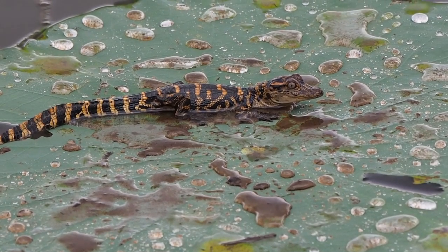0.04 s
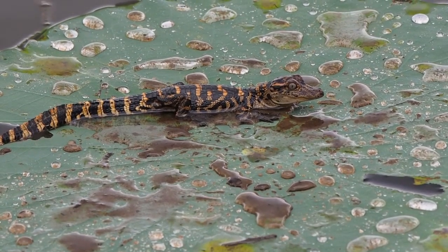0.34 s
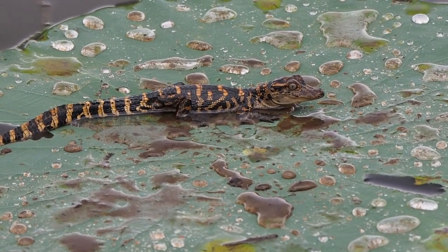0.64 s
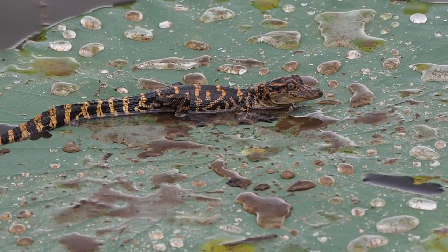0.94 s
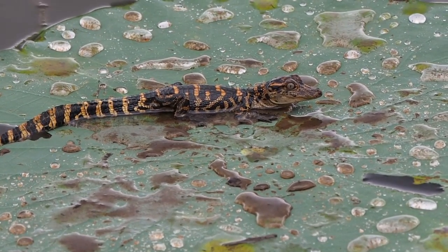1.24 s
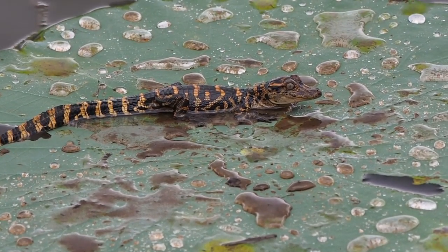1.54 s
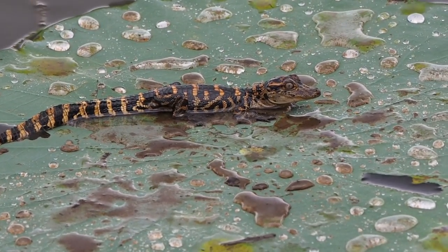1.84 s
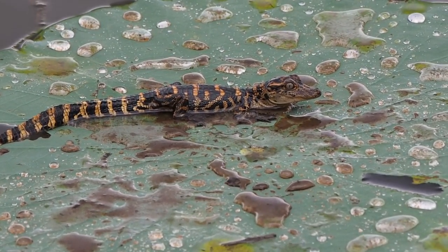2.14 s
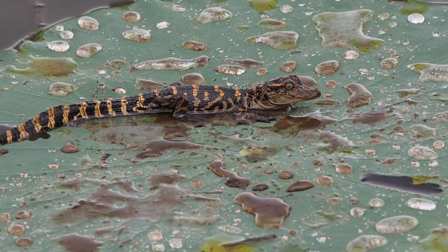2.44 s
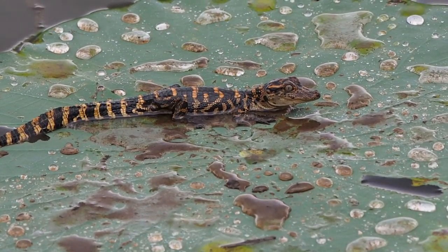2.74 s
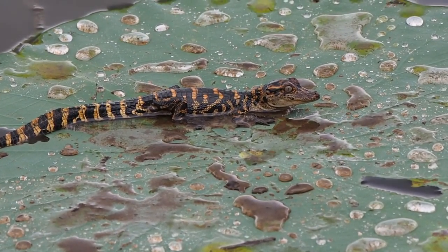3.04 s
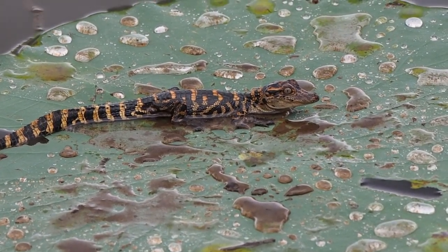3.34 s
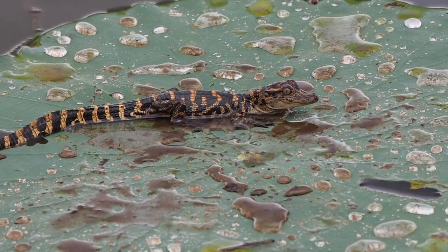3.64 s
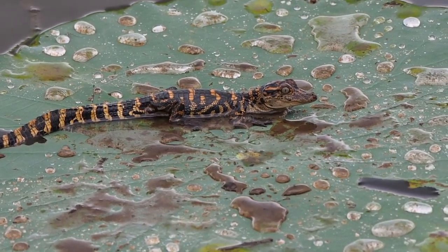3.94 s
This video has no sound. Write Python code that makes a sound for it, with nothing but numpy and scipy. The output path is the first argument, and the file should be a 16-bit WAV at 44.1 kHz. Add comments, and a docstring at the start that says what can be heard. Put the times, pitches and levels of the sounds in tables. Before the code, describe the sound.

A soft, steady breeze hisses through far plants while distant engines hum and leaves faintly tick.

```python
"""A quiet, breezy spot beside open water.
Wind and far traffic make a low rumble, under an even wash of wind in distant plants.
Far motors drone in the rumble, and two of them swell past the middle.
Close by, leaves brush together in short rustles and give tiny wet ticks and a fine crackle.
A thin sizzle, perhaps far insects, sits high above it all."""
import sys
import numpy as np
from scipy import signal
from scipy.fft import rfft, irfft
from scipy.io import wavfile

SR = 44100
rng = np.random.default_rng(int(sys.argv[2]) if len(sys.argv) > 2 else 0)


def to_wav(s):
    """Save 16-bit WAV."""
    ch = np.atleast_2d(s).T  # columns
    pcm = np.round(np.clip(ch, -1, 1) * 32767)  # PCM
    wavfile.write(sys.argv[1], SR, pcm.astype(np.int16))


N = 176400  # 4 seconds

# Colour (how strong each pitch is) of the rumble: pitch_hz, relative_db
RUMBLE_COLOUR = [(20, -16), (35, -30), (52, -9.5), (76, -4), (92, -5), (120, -3.5), (150, -3.5), (172, -1),
                 (194, -4.5), (222, -1.5), (245, -3.5), (272, -7), (380, -7), (500, -12), (900, -36),
                 (2000, -51)]
# The rumble swells with the motors: time_s, change_db
RUMBLE_RISE = [(0, -1), (1.1, -0.5), (1.7, 0), (2.7, 0), (3.3, -1), (4, -1.5)]
# Colour of the wind in far plants: pitch_hz, relative_db
WASH_COLOUR = [(250, -19.5), (520, -11), (630, 0), (730, -2.5), (820, -1.5), (920, -0.3), (1030, 1),
               (1150, -6.5), (1310, -8.5), (1470, -5.5), (2250, -7.5), (3050, -12), (3750, -13),
               (4600, -18), (5300, -21), (6100, -25), (6750, -26), (7300, -25), (9700, -24.5), (10900, -25),
               (12500, -25), (13300, -24.5), (15500, -26.5)]
# Strength of the breeze in those plants: time_s, change_db
BREEZE_STRENGTH = [(0, 0), (.9, 0), (1.4, 0.16), (2.4, 0.24), (3.1, -.1), (4, 0)]
# Brief surges in the far leaves: peak_time_s, level_db, half_length_s
LEAF_SURGES = [(.11, -62.5, .07), (.86, -63, 0.11), (1.22, -59, .05), (2.1, -65.5, .08),
               (2.48, -61.5, 0.16)]
# Colour of the surges: pitch_hz, relative_db
SURGE_COLOUR = [(1000, -16), (1800, 3.5), (2300, 4.5), (2900, -4.5), (5000, -16), (8000, -35)]
# Steady drones of far machines: pitch_hz, level_db, waver_hz
MACHINE_DRONES = [(105.5, -69.5, 1.2), (135.6, -66.5, 2.34), (171.5, -75, 4.95), (214.2, -71.5, 4.09)]
# A far motor revs up and eases off: time_s, firing_rate_hz, level_db
REVVING_MOTOR = [(0, 119, -74), (1.2, 119.2, -72.5), (1.85, 120, -66), (2.12, 124.1, -60.5),
                 (2.32, 129.6, -62), (2.58, 127.4, -59.5), (2.76, 133, -65), (2.88, 125, -60),
                 (3.2, 118.7, -65), (3.5, 117.4, -65.5), (3.75, 115.6, -61), (4, 114, -73)]
# A second motor fires unevenly: time_s, firing_rate_hz, level_db, roughness (0 to 1)
ROUGH_MOTOR = [(0, 112.5, -76, .3), (2.0, 112.4, -68.5, 0.4), (2.33, 113.4, -55.5, .2),
               (2.52, 114.1, -58, .25), (2.73, 115.6, -55.5, 0.25), (2.92, 113.3, -60, 0.6),
               (3.11, 113.3, -55, .4), (3.22, 111.4, -65.5, .4), (3.33, 112, -80, .3), (4, 113.2, -80, .3)]
# Its overtones, the tones above its firing rate: rate_multiple, relative_db
MOTOR_OVERTONES = [(1.5, -19), (1.86, -9.5), (2, -0.5), (3, -12)]
# Wet ticks: start_s, peak_db, pitch_hz, sharpness (higher rings longer), left_minus_right_db
WET_TICKS = [(0.144, -54, 9400, 5, -1), (0.237, -54, 6500, 1.5, -1), (0.373, -55, 7700, 5, -2),
             (0.404, -53, 4000, 3, -2), (1.3065, -42.5, 3900, 1.9, -3), (1.3275, -55, 8500, 4, -4),
             (1.3555, -53, 8800, 4, -1), (1.390, -56, 9000, 5, -2), (1.4685, -50, 9600, 5.2, -2),
             (1.4785, -50, 10500, 3, -4), (1.519, -50, 8750, 7.2, -1), (2.008, -56, 9700, 5, -2),
             (2.1085, -52, 9300, 9, -2), (2.1385, -52, 9200, 9, -1), (2.163, -58, 9300, 10, -1),
             (2.4317, -51, 8850, 4, 1), (2.6525, -55, 9640, 4, 0), (3.235, -55, 9000, 5.3, 0),
             (3.9135, -48.5, 4700, 2.3, -8)]
# Leaf rustles: start_s, level_db, rise_s, fall_s, treble_tilt_db_per_octave
LEAF_RUSTLES = [(0.156, -61.5, 0.016, .036, 7), (1.305, -68.5, .025, .06, -4),
                (1.465, -72, 0.01, 0.027, 12), (1.74, -67, 0.036, 0.028, 10), (2.09, -76, .06, .04, 12)]
# Colour of a rustle before its tilt: pitch_hz, relative_db
RUSTLE_COLOUR = [(2500, -29), (4800, 0), (8500, 0), (10000, -10), (12000, -29)]
# Loudness of the crackle of wet leaves: time_s, level_db
CRACKLE_LOUDNESS = [(0, -77), (.45, -75.5), (1.0, -77.5), (1.4, -78), (2.2, -78), (3.1, -75), (4, -77)]
# Loudness of the high sizzle: time_s, level_db
SIZZLE_LOUDNESS = [(0, -85), (1.1, -84), (1.7, -78), (2.15, -82), (2.6, -86), (4, -84)]
# Colour of the sizzle: pitch_hz, relative_db
SIZZLE_COLOUR = [(8800, -54), (9700, 7), (10100, 0), (11200, -52)]
# How alike the noise is at the two ears: pitch_hz, likeness (1 = the same, 0 = unrelated)
EAR_LIKENESS = [(30, 1), (130, 0.92), (240, 0.89), (320, 0.77), (490, 0.83), (665, 0.34), (760, 0.63),
                (930, 0.73), (1170, 0.63), (1470, 0.72), (2400, 0.62), (3100, 0.24), (4200, 0.012),
                (5500, -0.1), (8000, -0.052), (15000, -0.029)]
# Which ear gets more of the noise: pitch_hz, left_minus_right_db
EAR_BALANCE = [(100, 0), (400, 0.1), (620, 2.5), (830, -0.5), (1100, 1), (1450, -1), (1800, .1), (2200, -2),
               (2800, .3), (6000, .5), (7200, -2), (10000, -0.5), (15000, 0)]


def low_rumble(level_db=-56, gust_db=0.5):
    """Wind and far traffic blend into a deep noise that stirs slightly."""
    swell_db = over_time(RUMBLE_RISE)[0]
    return from_db(level_db + swell_db + gust_db * drift(4.1)) * air_noise(RUMBLE_COLOUR)


def wind_in_plants(level_db=-51.5, gust_db=0.26):
    """The breeze draws an even hiss from far leaves, with a brief surge now and then."""
    breeze_db = over_time(BREEZE_STRENGTH)[0]
    wash = from_db(level_db + breeze_db + gust_db * drift(21)) * air_noise(WASH_COLOUR)
    t = np.arange(N) / SR
    surges = sum(from_db(db) * np.exp(-0.5 * ((t - peak_s) / half_s) ** 2)
                 for peak_s, db, half_s in LEAF_SURGES)
    return wash + surges * air_noise(SURGE_COLOUR)


def machine_drones():
    """Far machines run steadily, each humming one low note."""
    return sum(from_db(db) * wavering_tone(hz, waver_hz, waver_rate_hz=5.5, fade_db=2, fade_rate_hz=4.5)
               for hz, db, waver_hz in MACHINE_DRONES)


def revving_motor():
    """A far motor hums at its firing rate, so the note rises as it revs up."""
    hz, db = over_time(REVVING_MOTOR)
    return from_db(db) * wavering_tone(hz, waver_hz=0.93, waver_rate_hz=6.1, fade_db=0.5, fade_rate_hz=8.1)


def rough_motor(flutter_hz=20):
    """A second motor is heard by its overtones; uneven firing makes them flutter together."""
    hz, db, roughness = over_time(ROUGH_MOTOR)
    firing = (1 + roughness * drift(flutter_hz)) / np.sqrt(1 + roughness ** 2)
    out = 0
    for multiple, overtone_db in MOTOR_OVERTONES:
        tone = wavering_tone(multiple * hz, waver_hz=1.11, waver_rate_hz=9.1, fade_db=0, fade_rate_hz=7)
        out += from_db(db + overtone_db) * firing * tone
    return out


def wet_ticks(decay_s=0.0012):
    """Each tick of a wet leaf is a tiny burst of noise that rings around one pitch."""
    out = np.zeros((2, N))
    t = np.arange(SR // 50) / SR
    for start_s, db, hz, sharpness, side_db in WET_TICKS:
        burst = rng.standard_normal(len(t)) * np.exp(-t / decay_s)
        tick = ring(burst, hz, sharpness)
        tick /= np.abs(tick).max()
        ear_gains = from_db([[db + side_db / 2], [db - side_db / 2]])
        start = int(start_s * SR)
        out[:, start:start + len(t)] += ear_gains * tick[:N - start]
    return out


def leaf_rustles(grain_db=1.5):
    """One leaf brushes another: each time a short, grainy hiss."""
    out = 0
    for start_s, db, rise_s, fall_s, tilt in LEAF_RUSTLES:
        t = np.arange(N) / SR - start_s
        envelope = np.clip(t / rise_s, 0, 1) * np.exp(-np.maximum(t - rise_s, 0) / fall_s)
        colour = [(hz, level + tilt * np.log2(hz / RUSTLE_COLOUR[0][0])) for hz, level in RUSTLE_COLOUR]
        hiss = air_noise(colour) * from_db(grain_db * drift(250))
        out += from_db(db) * envelope * unit_level(hiss)
    return out


def leaf_crackle(pops_per_s=540, low_hz=7340, high_hz=10400, pitches=8, spread_db=1, clump_db=3.5):
    """Wet leaves give countless tiny, high pops of uneven size, scattered on both sides."""
    out = 0
    for hz in np.geomspace(low_hz, high_hz, pitches):
        pops = rng.random((2, N)) < pops_per_s / pitches / SR
        sizes = from_db(spread_db * np.minimum(rng.exponential(1, (2, N)), 4))
        out += ring(pops * sizes + 1e-18, hz, sharpness=14)
    # The level wanders, so the pops seem to come in clumps.
    return from_db(over_time(CRACKLE_LOUDNESS)[0] + clump_db * drift(10)) * unit_level(out)


def high_sizzle(throb_db=3.0):
    """A thin, high hiss, perhaps far insects, throbs unevenly."""
    return from_db(over_time(SIZZLE_LOUDNESS)[0] + throb_db * drift(25)) * air_noise(SIZZLE_COLOUR)


def air_noise(colour):
    """Noise of a given colour from all around, alike at both ears in the bass."""
    hz = np.fft.rfftfreq(N, 1 / SR)
    shared, opposed = rfft(rng.standard_normal((2, N)))
    likeness = np.clip(at_pitch(EAR_LIKENESS, hz), -0.99, 0.99)
    sides = np.array([[1], [-1]])  # left, right
    ears = np.sqrt(1 + likeness) * shared + np.sqrt(1 - likeness) * opposed * sides
    shape_db = at_pitch(colour, hz) + sides * at_pitch(EAR_BALANCE, hz) / 2
    return unit_level(irfft(ears * from_db(shape_db), N))


def wavering_tone(hz, waver_hz, waver_rate_hz, fade_db, fade_rate_hz):
    """A far tone whose pitch and level wander on the way through the air."""
    cycles = np.cumsum(hz + waver_hz * drift(waver_rate_hz)) / SR + rng.random()
    return unit_level(np.sin(2 * np.pi * cycles) * from_db(fade_db * drift(fade_rate_hz)))


def ring(x, hz, sharpness):
    """Make a sound ring around one pitch."""
    return signal.lfilter(*signal.iirpeak(hz, sharpness, fs=SR), x)


def drift(rate_hz):
    """A random wobble of typical size 1, mostly slower than rate_hz."""
    hz = np.fft.rfftfreq(N, 1 / SR)
    spectrum = rfft(rng.standard_normal(N)) * (hz > 0)
    return unit_level(irfft(spectrum / (1 + (hz / rate_hz) ** 2), N))


def over_time(table):
    """Join a table's rows with straight lines: one curve for each column after time_s."""
    times_s, *columns = np.transpose(table)
    return [np.interp(np.arange(N) / SR, times_s, column) for column in columns]


def at_pitch(table, hz):
    """Read a table between its pitches, with octaves evenly spaced."""
    pitches_hz, values = np.transpose(table)
    return np.interp(np.log(hz + 1), np.log(pitches_hz), values)


def from_db(db):
    """Turn decibels into a number to multiply by."""
    return 10 ** (np.asarray(db) / 20)


def unit_level(x):
    """Scale a signal to an average (rms) level of 1."""
    return x / np.sqrt(np.mean(x ** 2) + 1e-20)


def scene():
    """Wind and motors far off, leaves close by, and a thin sizzle on top."""
    far = low_rumble() + wind_in_plants() + machine_drones() + revving_motor() + rough_motor()
    near = wet_ticks() + leaf_crackle() + leaf_rustles()
    return far + near + high_sizzle()


def record(dry, offset=-0.0028, cutoff_hz=15850):
    """Shift the wave slightly off zero and cut the highest treble steeply."""
    hz = np.fft.rfftfreq(N, 1 / SR)
    return irfft(rfft(dry + offset) / np.sqrt(1 + (hz / cutoff_hz) ** 500), N)


dry = scene()
out = record(dry)
to_wav(out)
```